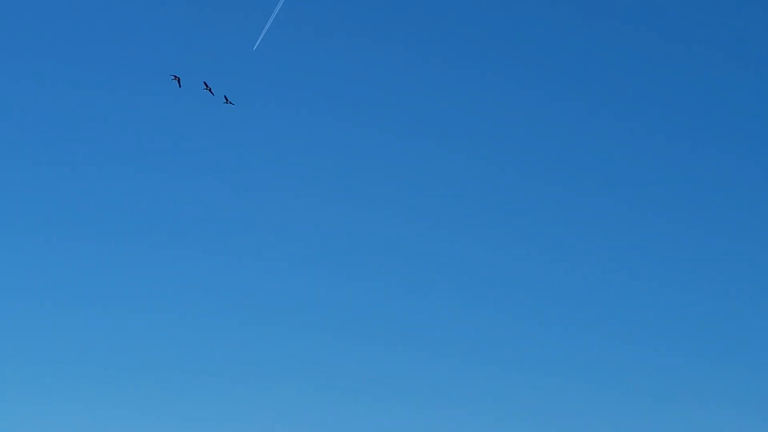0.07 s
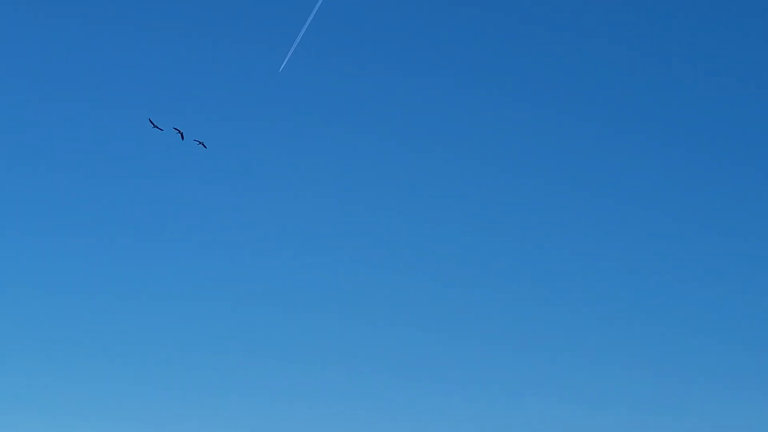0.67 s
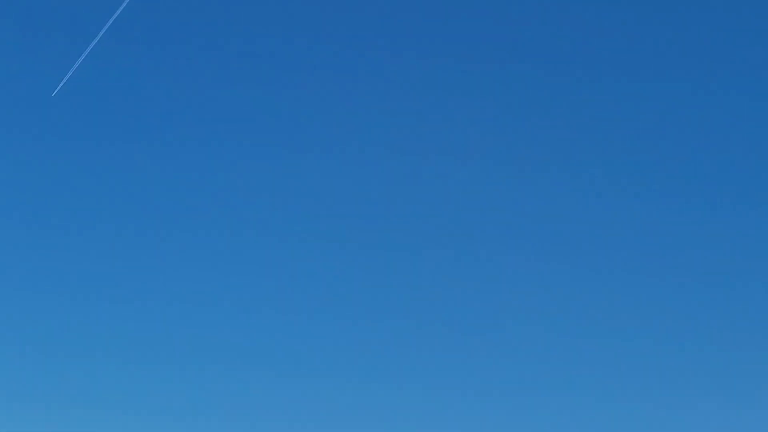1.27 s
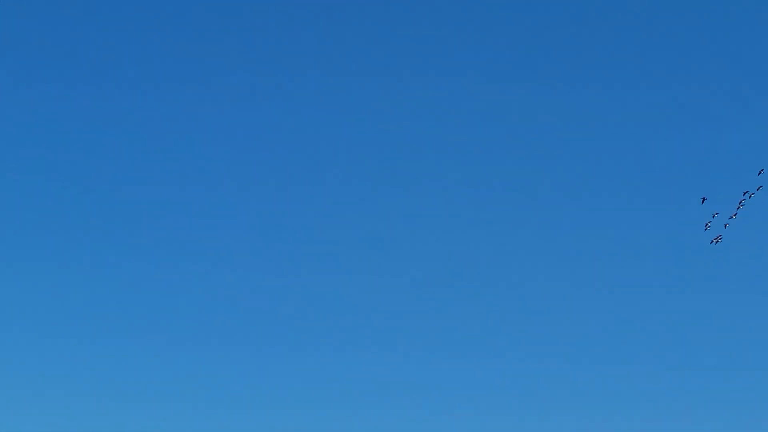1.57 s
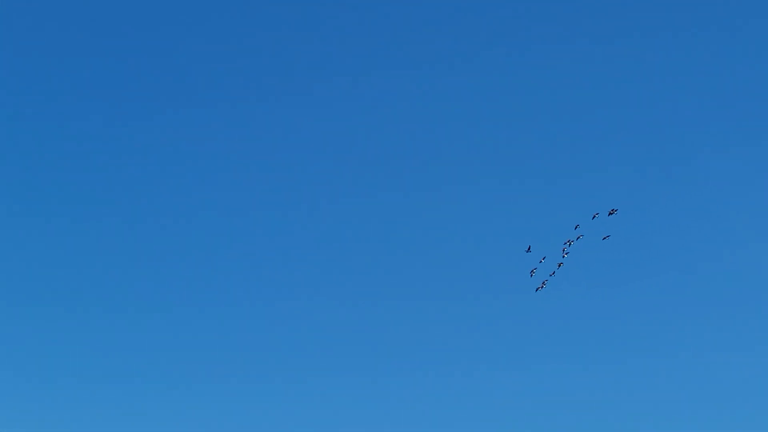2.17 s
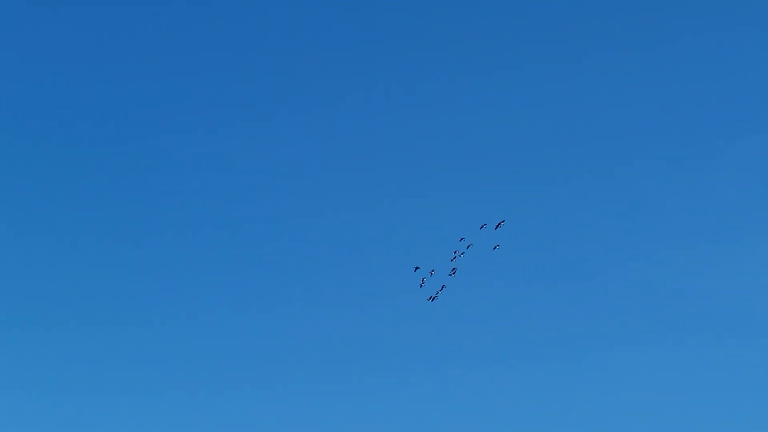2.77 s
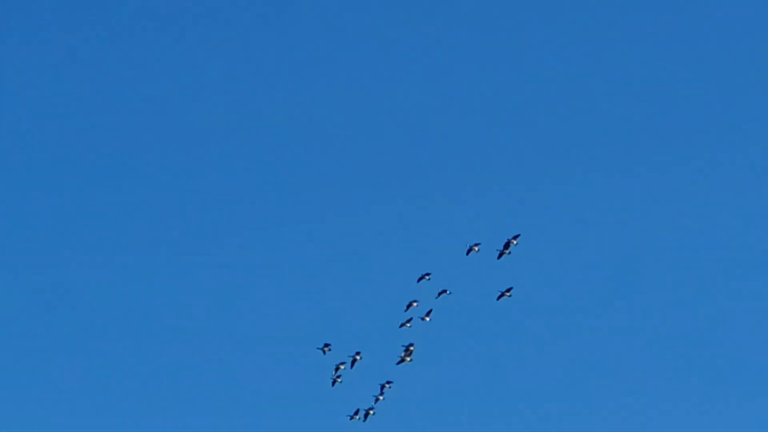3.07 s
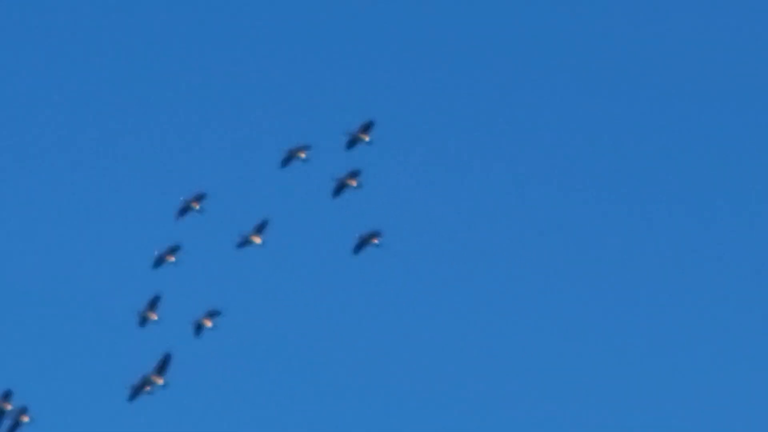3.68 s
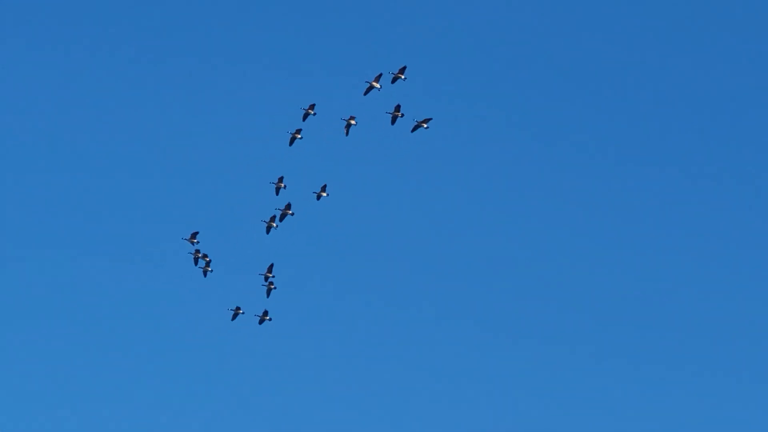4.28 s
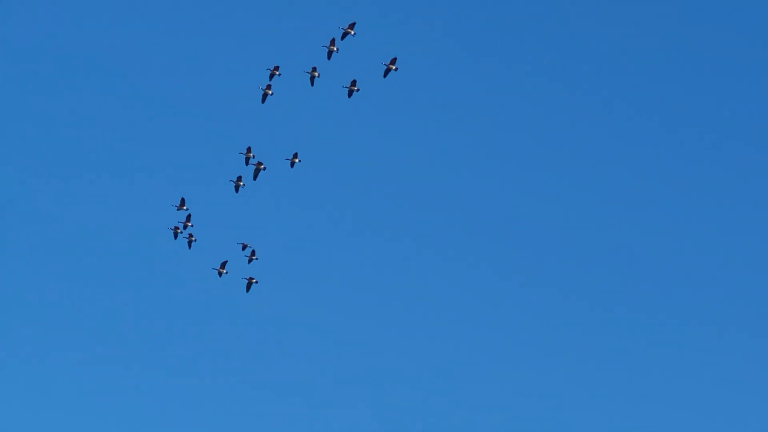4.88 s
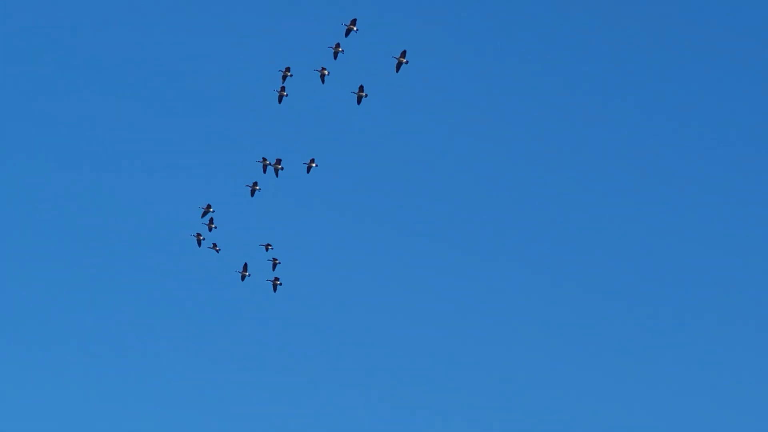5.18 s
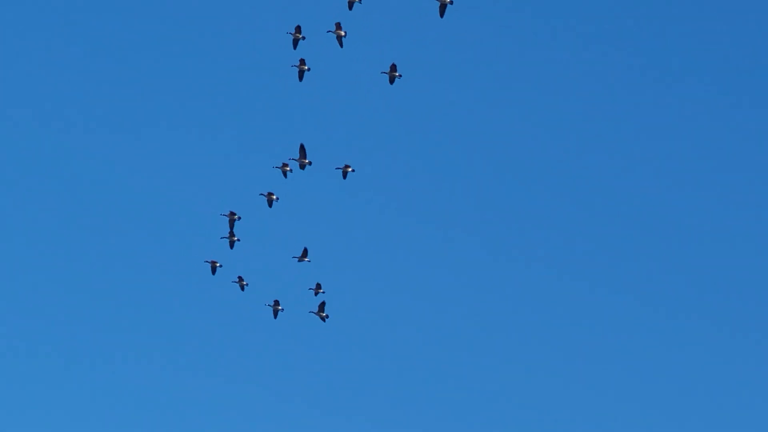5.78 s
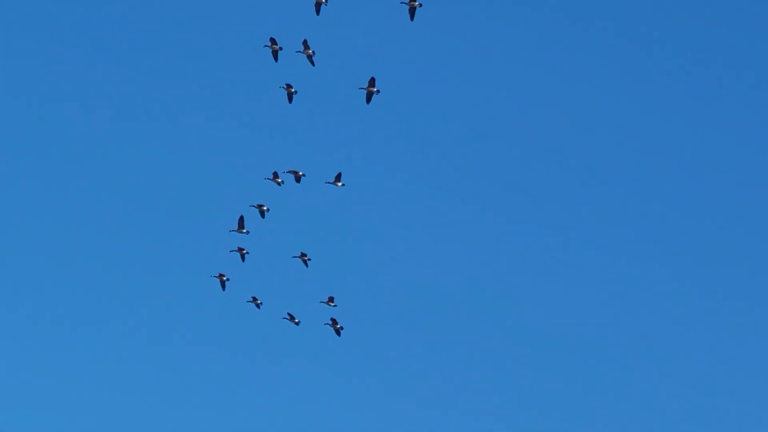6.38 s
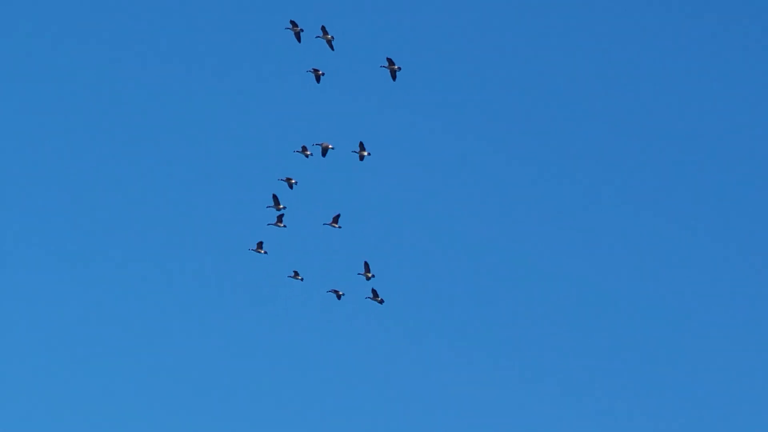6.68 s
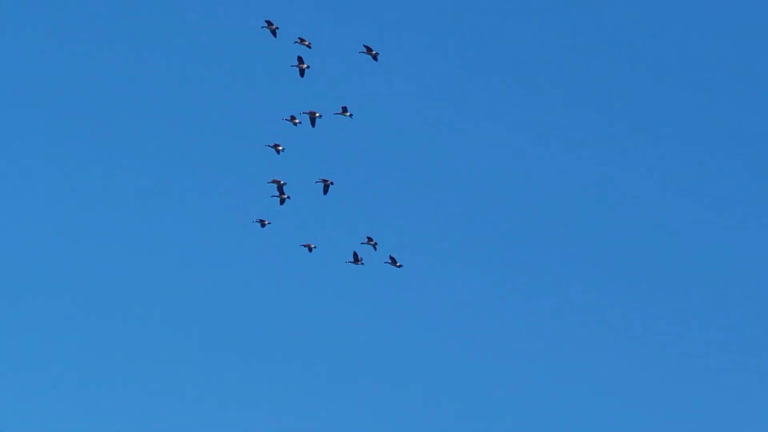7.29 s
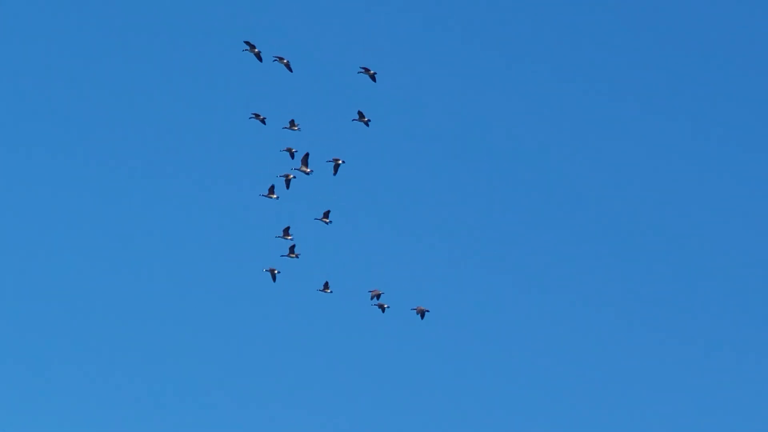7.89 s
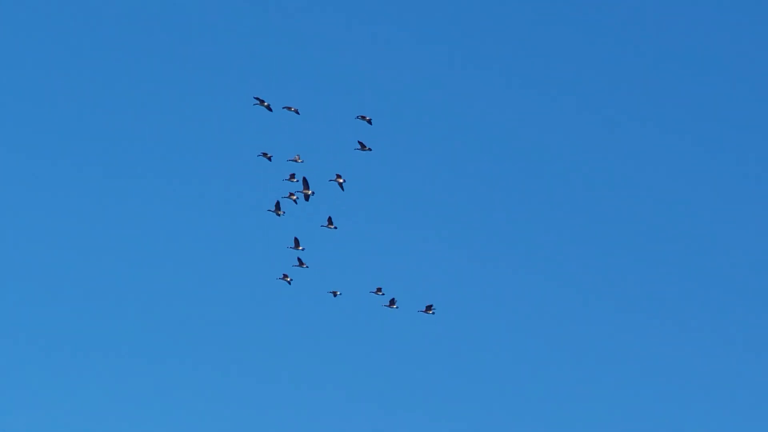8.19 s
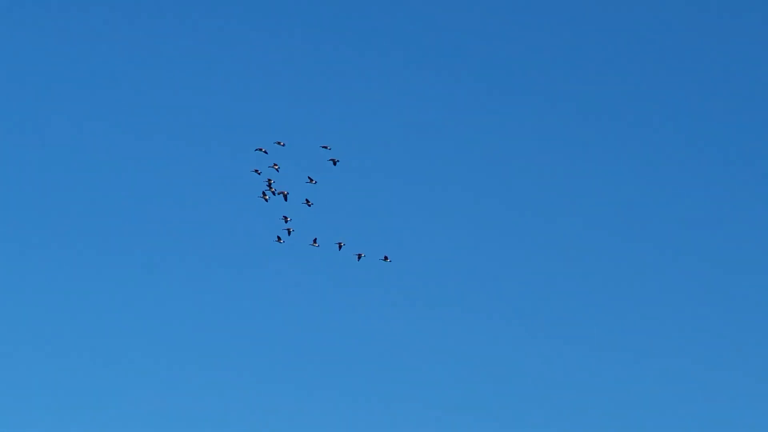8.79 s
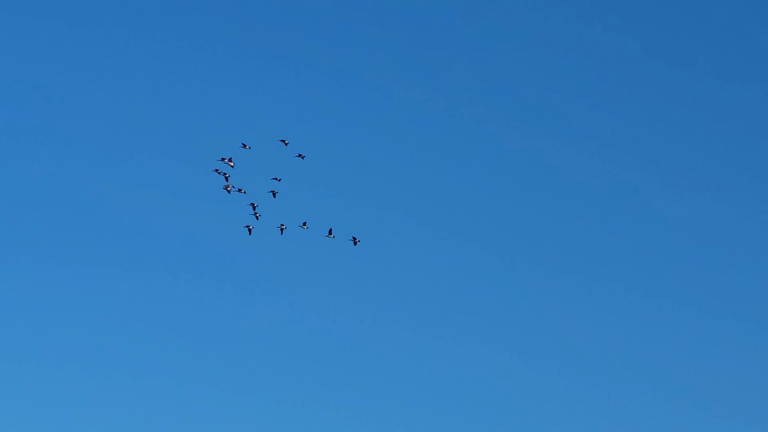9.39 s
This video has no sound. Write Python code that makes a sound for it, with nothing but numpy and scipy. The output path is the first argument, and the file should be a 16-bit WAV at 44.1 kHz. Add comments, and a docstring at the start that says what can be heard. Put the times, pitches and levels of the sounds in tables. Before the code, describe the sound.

A flock of geese flies overhead, trading honks and hoarse barks over wind rumble, soft hiss and a low throbbing drone.

```python
"""Geese passing overhead

A skein of geese trades clear honks and hoarse barks, and a bird with a long nasal call joins in.
Each voice is a buzzing syrinx, coloured by the resonances of the throat. Underneath throbs a low
drone, probably an idling engine, with wind rumble, soft hiss and a few ticks of a hand-held camera."""
import sys
import numpy as np
from scipy import signal
from scipy.fft import rfft, irfft
from scipy.io import wavfile
from scipy.ndimage import map_coordinates

SR = 44100
rng = np.random.default_rng(int(sys.argv[2]) if len(sys.argv) > 2 else 0)


def to_wav(sig):
    """Store sig (one row per channel, or 1-D mono) as 16-bit WAV at the path in sys.argv[1].

    Samples outside -1..1 are clipped; the rate is SR.
    """
    pcm = np.clip(np.atleast_2d(sig), -1, 1) * 32767
    pcm = np.round(pcm).astype(np.int16)
    wavfile.write(sys.argv[1], SR, pcm.T)  # frames by channels


N = 420273
TIME = np.arange(N) / SR

# Faders for the air. Each row: time in seconds, wind rumble in dB, far hiss in dB.
AIR_LEVELS = [(0.05, -36.5, -46.5), (2.63, -37, -47.5), (3.31, -32.5, -45), (7.44, -31, -42.5),
              (9.5, -33, -43)]
# Tone of the rumble and of the hiss. Each row: frequency in Hz, spectral level in dB.
RUMBLE_SPECTRUM = [(25, -4), (45, 4), (75, 9), (100, -3.5), (170, -3), (240, -8.5), (320, -20.5),
                   (500, -35), (1000, -60.5)]
HISS_SPECTRUM = [(200, 10), (400, 4.5), (650, 4.5), (1000, 3), (1600, -0.5), (2700, -2), (3600, -9.5),
                 (5200, -11), (6800, -23.5), (9000, -39)]
# Stereo image of the air. Each row: frequency in Hz, left-right likeness from 0 to 1.
AIR_LIKENESS = [(60, 0.18), (150, 1), (300, 0.9), (600, 0.39), (1200, 0.13), (6000, 0.0069)]
# The engine's drifting idle. Each row: time in seconds, cycles per second.
ENGINE_SPEED = [(0.0, 5.099), (1.0, 5.244), (2.0, 5.074), (3.0, 5.058), (4.0, 4.891), (5.0, 4.829),
                (6.5, 4.831), (8.0, 4.894), (9.53, 4.85)]
# The drone's partials, main tone first. Each row: multiple of the cycle rate, level in dB.
ENGINE_ORDERS = [(11, 6), (8, -6), (10, -7.5), (13, -1), (14, -15), (16, -14), (24, -11.5)]
# Fader for the drone. Each row: time in seconds, level in dB.
ENGINE_LEVEL = [(0, -17.5), (1.6, -20), (2.4, -22.5), (2.7, -20.5), (3.1, -16.5), (4.6, -18), (6, -18),
                (7.7, -16), (8.7, -18.5), (9.53, -17.5)]
# Handling knocks. Each row: start in seconds, peak in dB.
TICK_HITS = [(.081, -27), (0.097, -30), (.78, -29), (1.964, -32)]
# Modes of the camera's body. Each row: frequency in Hz, level in dB, seconds to fade by 60 dB.
CAMERA_MODES = [(634, -12, 0.051), (1090, -15, 0.042), (1380, -3.5, 0.012), (2750, -17.5, 0.0097),
                (4920, -11, 0.0019)]

# Throat resonances. Each row: centre in Hz, width in Hz.
GOOSE_THROAT = [(1450, 520), (2700, 2300), (4900, 1580), (8600, 550)]   # low, middle, bright ring, thin edge
DISTANT_THROAT = [(700, 610), (1400, 2000)]   # what distance leaves of a honk
NASAL_RESONANCE = [(2370, 1270)]
# The flock's pass. Each row: time in seconds, level of a far honk in dB, right-ear lag in ms.
FLOCK_PATH = [(0, -57, 0.12), (2.2, -56, 0.26), (4, -47.5, 0.24), (6, -46, 0.12), (8, -46, 0.031),
              (9.5, -49, -0.12)]
# Replies from farther off. Each row: start in seconds, length in seconds, top pitch in Hz,
# place of that top from 0 to 1, level in dB.
ANSWER_CALLS = [(0.498, 0.049, 705, 0.9, -50), (0.655, 0.11, 800, 0.55, -48), (0.81, 0.13, 763, 0.2, -55),
                (1.422, 0.08, 809, 0.5, -48.5), (1.47, 0.07, 772, 0.6, -50), (2.653, 0.13, 737, 0.3, -47),
                (4.037, 0.091, 690, 0.7, -47), (4.115, 0.077, 621, 0.9, -46.5),
                (4.451, 0.09, 743, 0.9, -42), (4.647, 0.1, 741, 0.8, -42), (4.749, 0.07, 783, 0.8, -40.5),
                (4.875, 0.08, 736, 0.4, -38), (5.435, 0.078, 718, 0.7, -51),
                (5.756, 0.073, 726, 0.45, -45.5), (6.206, 0.02, 735, 0.6, -36),
                (6.298, 0.069, 779, 0.8, -40.5), (6.471, 0.07, 756, 0.2, -38.5),
                (6.787, 0.052, 704, 0.5, -37.5), (6.788, 0.07, 800, 0.52, -40),
                (6.846, 0.087, 737, 0.6, -41), (7.202, 0.05, 796, 0.6, -41.5),
                (7.624, 0.061, 806, 0.4, -45), (7.847, 0.064, 726, 0.6, -49),
                (7.978, 0.07, 737, 0.5, -42.5), (9.12, 0.052, 753, 0.51, -50)]
# The nasal bird's part. Each row: start in seconds, length in seconds, top pitch in Hz,
# place of that top from 0 to 1, level in dB, roughness (0 is clean).
LONG_CALLS = [(5.57, 0.22, 259, 0.53, -42.5, 0.4), (6.169, 0.21, 254.6, 0.5, -42.5, 0.6),
              (7.943, 0.265, 251.4, 0.43, -38, 0.3), (8.374, 0.31, 237.3, 0.3, -45, 0.2),
              (8.898, 0.26, 241.2, 0.2, -44, 0.36)]
# Hoarse low barks. Each row: start in seconds, length in seconds, top pitch in Hz, level in dB,
# bright ring in dB against that level, nasal resonance in Hz, roughness (0 is clean).
BARK_CALLS = [(0.178, 0.073, 391.3, -41.5, -18, 1920, 0.54), (1.22, 0.08, 553.5, -43, -26, 1990, 0.8),
              (2.215, 0.086, 287.3, -45.5, -13.5, 1930, 0.62), (2.758, 0.058, 276.3, -39, -30, 1870, 0.1),
              (3.293, 0.086, 282.4, -36.5, -20.5, 1980, 0.6), (3.68, 0.09, 384, -46.5, -11.5, 1640, 0.7),
              (4.192, 0.096, 563, -35.5, -6, 2080, 0.98), (4.46, 0.094, 463.5, -40.5, -34, 1460.0, 0.7),
              (5.179, 0.081, 422, -41, -33, 1310, 0.8), (5.695, 0.038, 431.4, -40.5, -21, 1990, 1.1),
              (5.935, 0.12, 321.6, -38.5, -14, 1970, 0.65), (6.17, 0.085, 357, -39.5, -21, 1910, 1),
              (6.503, 0.08, 547.4, -34.5, -31, 2130, 0.41), (6.79, 0.12, 400, -43.5, -20, 1980, 0.4),
              (7.233, 0.079, 557.4, -40.5, -8, 1650, 0.8), (7.435, 0.11, 377, -39.5, -14, 1620, 1.1),
              (7.905, 0.125, 371, -37, -24.5, 1550, 1), (8.57, 0.038, 418.3, -40.5, -12, 1720.0, 0.8),
              (9.228, 0.065, 465, -45, -10, 1230, 0.6), (9.463, 0.092, 379, -42, -27, 1594, 0.3)]
# Clear honks. Each row: start in seconds, length in seconds, top pitch in Hz, level in dB,
# bright ring in dB against that level.
HONK_CALLS = [(0.482, 0.072, 932, -44, -3.5), (0.554, 0.032, 968, -50, -9.5), (0.717, 0.05, 791, -47, 6.5),
              (0.789, 0.065, 780, -52.5, 10), (1.061, 0.045, 886, -47, 0.5), (1.126, 0.06, 1212, -46, -24),
              (1.274, 0.044, 1114, -49, -24), (1.334, 0.065, 1062, -49, 8.5), (1.383, 0.055, 940, -50, -2),
              (1.549, 0.052, 691, -50, -3), (1.967, 0.052, 974, -52, -2), (2.459, 0.065, 934, -56, 3),
              (2.583, 0.044, 950, -54.5, -0.5), (2.778, 0.045, 706, -48.5, -1),
              (2.929, 0.05, 768, -44.5, -18.5), (2.977, 0.042, 750, -54.5, 1), (3.01, 0.065, 761, -42, -13),
              (3.119, 0.064, 940, -58.5, -1), (3.194, 0.043, 748, -39.5, -28),
              (3.373, 0.084, 710, -46.5, -5.5), (3.467, 0.054, 893, -55.5, 4.5),
              (3.505, 0.052, 959, -56, 8.5), (3.589, 0.065, 952, -51, -6), (3.691, 0.052, 772, -42, -18),
              (3.917, 0.064, 817, -44.5, -13), (4.075, 0.045, 914, -55.5, 5.5),
              (4.445, 0.055, 688, -43.5, 1.5), (4.521, 0.04, 770, -38, -6), (4.579, 0.024, 842, -48.5, 3.5),
              (4.985, 0.055, 872, -48, 3.5), (5.049, 0.055, 768, -45, -4), (5.107, 0.064, 939, -56.5, 9.5),
              (5.266, 0.081, 654, -48, -3.5), (5.499, 0.066, 932, -62, 7), (6.059, 0.06, 921, -43.5, -3.5),
              (6.582, 0.06, 845, -57.5, 7), (6.736, 0.09, 850, -47, -1.5), (6.918, 0.075, 889, -47.5, -3.5),
              (7.39, 0.05, 821, -39.5, -13), (7.478, 0.042, 835, -44, -1), (7.783, 0.05, 817, -40.5, -1.5),
              (8.023, 0.03, 883, -47, 5), (8.248, 0.04, 822, -36, -13), (8.725, 0.02, 744, -43, -9),
              (8.76, 0.032, 790, -36.5, -16), (8.815, 0.063, 754, -41, -17),
              (8.933, 0.036, 743, -42, -11.5), (9.008, 0.04, 746, -48, -7), (9.041, 0.029, 792, -37, -10),
              (9.342, 0.042, 822, -46.5, -2)]
# The honks grow hoarse in bouts. Each row: time in seconds, roughness from 0 to 1.
HONK_HOARSENESS = [(1, 0.25), (4.1, 0.35), (4.45, 0.6), (4.95, 0.25), (6.1, 0.3), (6.6, 0.6), (8.3, 0.42)]
# The honks' bright ring as the flock passes. Each row: time in seconds, centre in Hz.
HONK_RING = [(0.5, 5530), (2.8, 5240), (3.1, 5060), (6.8, 5020), (8, 5420)]

# The ground bounce, latest with the birds overhead. Each row: time in seconds, delay in seconds.
GROUND_DELAY = [(0, 0.0042), (6.5, .009), (9.5, .007)]
# Tone difference between the microphones. Each row: frequency in Hz, left minus right in dB.
MIC_BALANCE = [(300, 0), (650, -2), (1000, 1.5), (1700, 1.5), (2500, 5), (3600, 5), (4600, -1), (5800, 1.5),
               (7000, 14), (9000, 0)]
# Phase between the microphone ports. Each row: frequency in Hz, lead of the left in radians.
MIC_PHASE = [(400, 0), (1000, .4), (1800, .8), (2500, .6), (3700, 4), (4200, 5), (5200, 9), (6500, 8.5)]

CUTOFF_HZ = 6837   # the treble steps down above this


def from_db(db):
    """Decibels to gain."""
    return 10 ** (np.asarray(db) / 20)


def unit_rms(x):
    """Scales a sound to rms 1."""
    return x / np.sqrt(np.mean(x ** 2) + 1e-20)


def in_time(rows, at=TIME):
    """The columns of an automation curve, read at the given times."""
    seconds, *columns = np.transpose(rows)
    return [np.interp(at, seconds, column) for column in columns]


def per_bin(points):
    """An EQ curve, read at every Fourier bin."""
    hz, value = np.transpose(points)
    return np.interp(np.log(np.fft.rfftfreq(N, 1 / SR) + 1), np.log(hz), value)


def wander(rate_hz, size):
    """A random drift with a spread of about 1."""
    at = np.arange(size) * rate_hz / SR
    return map_coordinates(rng.standard_normal(int(at[-1]) + 2), [at], order=1)


def add(track, start, sound):
    """Mixes a sound into a track at a start time in seconds."""
    at = int(np.clip(start * SR, 0, N - 1))
    track[at:at + len(sound)] += sound[:N - at]


def air_noise(spectrum):
    """Shaped stereo noise, centred in the upper bass and wide in the treble."""
    alike = np.clip(per_bin(AIR_LIKENESS), 0, 1)
    mid, side = rfft(rng.standard_normal((2, N))) * from_db(per_bin(spectrum))
    return unit_rms(irfft(np.sqrt(1 + alike) * mid + np.sqrt(1 - alike) * side * [[1], [-1]], N))


def outdoor_hiss(trim_db=1.0):
    """A soft bed of far-off hiss."""
    return from_db(in_time(AIR_LEVELS)[1] + trim_db) * air_noise(HISS_SPECTRUM)


def wind_rumble(trim_db=6.5, gust_db=2.0):
    """Low wind noise, shaken by quick gusts."""
    level_db = in_time(AIR_LEVELS)[0] + trim_db + gust_db * wander(12, N)
    return from_db(level_db) * air_noise(RUMBLE_SPECTRUM)


def engine(unsteady_db=2.0, slip_radians=0.24, first_dip_cycles=0.213):
    """Once a cycle the side partials pull against the main tone, so the drone throbs."""
    turn = 2 * np.pi * (np.cumsum(in_time(ENGINE_SPEED)[0]) / SR - first_dip_cycles)
    (main_order, main_db), *sides = ENGINE_ORDERS
    main_tone = from_db(main_db) * np.cos(main_order * turn)
    side_tones = sum(from_db(db) * np.cos(order * turn - slip_radians) for order, db in sides)
    level_db = in_time(ENGINE_LEVEL)[0] + unsteady_db * wander(5.9, N)
    return from_db(level_db) * unit_rms(side_tones - main_tone)


def camera_ticks():
    """Small knocks ring the camera's body for a moment."""
    out, t = np.zeros(N), TIME[:SR // 20]
    ring = sum(from_db(db - 60 * t / t60) * np.sin(2 * np.pi * hz * t) for hz, db, t60 in CAMERA_MODES)
    for start, peak_db in TICK_HITS:
        add(out, start, from_db(peak_db) * ring / np.abs(ring).max())
    return out


def bird_call(length, pitch, top, levels_db, rough, throat, bend, scoop=0.04, droop=0.049,
              waver=0.0036, settle=0.94, jitter=0.016, rasp=0.96, subharmonics=0.98, fundamental_db=0.0,
              twinkle_db=2.5, swell=0.46, bright_swell=0.29, lateness=0.86, steep=1.58):
    """A syrinx buzzes on an arch of pitch, heard through the throat's resonances."""
    size = int(length * SR)
    progress = np.linspace(0, 1, size)
    arch = -bend * (progress - top) ** 2 - scoop * (1 - progress) ** 6 - droop * progress ** 6
    hz = pitch * np.exp(arch + waver * wander(70, size))
    hoarse = 2 * rough * (1 - progress) ** settle   # a hoarse start firms into a clean tone
    phase = 2 * np.pi * np.cumsum(hz * (1 + jitter * hoarse * wander(400, size))) / SR

    # Strong and weak beats in turn put partials halfway between the harmonics.
    orders = np.arange(2, int(3 * CUTOFF_HZ / pitch))[:, None] / 2
    strength = np.where(orders % 1 == 0, 1, subharmonics * hoarse)
    strength *= from_db(fundamental_db * (orders == 1))   # a small bill radiates the lowest one poorly
    flutter = np.array([wander(260, size) for _ in orders])
    twinkle = np.array([wander(44.3, size) for _ in orders])   # moving air makes partials come and go
    strength *= from_db(twinkle_db * twinkle) * (1 + rasp * hoarse * flutter)
    scatter = 1.22 * rng.standard_normal(orders.shape)   # loosely in step: still one pulse a beat
    partials = strength * np.cos(orders * phase + scatter)

    push = np.abs(np.sin(np.pi * progress ** lateness))   # lateness over 1 delays the peak
    out = 0
    for n, ((centre_hz, width_hz), level_db) in enumerate(zip(throat, levels_db)):
        moving_hz = centre_hz * (hz / pitch) ** 0.66   # the throat closes as the pitch falls
        resonance = 1 / (1 + (2 * (orders * hz - moving_hz) / width_hz) ** 2) ** steep
        effort = push ** (swell + bright_swell * n)   # later resonances in the list need more push
        out = out + from_db(level_db) * unit_rms(effort * (resonance * partials).sum(0))
    return out


def far_flock(count=190, centre_pitch_hz=620, dull_db=(-12.0, -7.0)):
    """The rest of the flock is a dense tangle of falling honks, dulled by distance."""
    out = np.zeros(N)
    for n, (when, long, high, loud) in enumerate(rng.uniform(-1, 1, (count, 4))):
        start = (n + 0.5 + when) / count * TIME[-1]
        length = 0.1 + 0.03 * long
        pitch = centre_pitch_hz * 2 ** (0.55 * high)
        levels_db = in_time(FLOCK_PATH, start)[0] + 4 * loud + np.array(dull_db)
        add(out, start, bird_call(length, pitch, top=0.352, levels_db=levels_db, rough=0.23,
                                  throat=DISTANT_THROAT, bend=0.422, fundamental_db=-3.0))
    return out


def answering_geese(hollow_db=(-1.0, -17.0), overhang_s=0.01):
    """Birds farther off answer with hollow, nearly clean honks that have lost their bright ring."""
    out = np.zeros(N)
    for start, length, pitch, top, level_db in ANSWER_CALLS:
        answer = bird_call(length + 2 * overhang_s, pitch, top, level_db + np.array(hollow_db),
                           rough=0.13, throat=GOOSE_THROAT[:2], bend=0.25, droop=0.077, waver=0.007)
        add(out, start - overhang_s, answer)
    return out


def nasal_bird():
    """A long, slow buzz through a single resonance."""
    out = np.zeros(N)
    for start, length, pitch, top, level_db, rough in LONG_CALLS:
        add(out, start, bird_call(length, pitch, top, [level_db], rough, NASAL_RESONANCE,
                                  bend=0.42, swell=0.24, lateness=0.85, subharmonics=0.4))
    return out


def barking_geese(body_trim_db=-3.5, ring_trim_db=-0.5, edge_db=-28.5, overhang_s=0.008):
    """Near geese in their low voice: a rasp builds into a nasal tone and breaks off."""
    out = np.zeros(N)
    windpipe, nasal_bite = (1110, 200), (2870, 1100)   # centre and width in Hz
    for start, length, pitch, level_db, bright_db, nasal_hz, rough in BARK_CALLS:
        body_db = level_db + body_trim_db
        windpipe_db = body_db + 0.5 - 11 * rough   # a firm bark also rings the windpipe
        bite_db = body_db - 7.5 + 0.12 * (bright_db + 15.0)
        ring_db = level_db + bright_db + ring_trim_db
        throat = [(nasal_hz, 560), windpipe, nasal_bite, *GOOSE_THROAT[2:]]
        levels_db = [body_db, windpipe_db, bite_db, ring_db, ring_db + edge_db]
        bark = bird_call(length + 2 * overhang_s, pitch, top=0.5, levels_db=levels_db, rough=rough,
                         throat=throat, bend=0.16, droop=0.062, settle=1.2, rasp=1.0, subharmonics=0.64,
                         swell=0.39, bright_swell=0.15, lateness=1.41, steep=1.19)
        add(out, start - overhang_s, bark)
    return out


def honking_geese(body_trim_db=-4.0, ring_trim_db=-2.5, edge_db=-28.5, usual_hz=820, overhang_s=0.0093):
    """Near geese in their high voice: every honk starts hoarse, firms up and falls away."""
    out = np.zeros(N)
    low, middle, (_, ring_width_hz), edge = GOOSE_THROAT
    for start, length, pitch, level_db, bright_db in HONK_CALLS:
        # A higher honk opens the bill: weight moves from the low to the middle resonance.
        opening = from_db(-4.5 + 23.5 * np.log2(pitch / usual_hz))
        weights = np.array([1, opening]) / np.hypot(1, opening)
        body_db = level_db + body_trim_db + 20 * np.log10(weights)
        ring_db = level_db + bright_db + ring_trim_db
        throat = [low, middle, (in_time(HONK_RING, start)[0], ring_width_hz), edge]
        levels_db = [*body_db, ring_db, ring_db + edge_db]
        rough = in_time(HONK_HOARSENESS, start)[0]
        top, scoop = np.array([0.42, 0.05]) * (1 + 0.4 * rng.uniform(-1, 1, 2))   # no two arches alike
        honk = bird_call(length + 2 * overhang_s, pitch, top, levels_db, rough, throat, bend=0.16,
                         scoop=scoop, droop=0.022, waver=0.006, settle=1.8, subharmonics=0.65)
        add(out, start - overhang_s, honk)
    return out


def open_air(birds, t60=0.11, scatter_db=-5.0, ground_db=-3.5, dull_hz=2800):
    """The calls reach one ear late, bounce off the ground and scatter dully from the surroundings."""
    def delayed(seconds):
        return map_coordinates(birds, [(TIME - seconds) * SR], order=2)

    ear_lag = in_time(FLOCK_PATH)[1] / 1000
    direct = np.array([delayed(-ear_lag / 2), delayed(ear_lag / 2)])
    bounce = from_db(ground_db) * delayed(in_time(GROUND_DELAY)[0])
    t = TIME[:SR]
    tail = rng.standard_normal((2, SR)) * from_db(-60 * t / t60) * (1 - np.exp(-t / 0.011))
    tail = signal.sosfilt(signal.butter(2, dull_hz, fs=SR, output="sos"), unit_rms(tail) / np.sqrt(SR))
    return direct + bounce + from_db(scatter_db) * signal.fftconvolve(birds[None], tail, axes=1)[:, :N]


def scene():
    """Geese in the open air over wind, hiss, the drone and a few ticks."""
    air = wind_rumble() + outdoor_hiss()
    birds = honking_geese() + barking_geese() + answering_geese() + far_flock() + nasal_bird()
    return air + open_air(birds) + engine() + camera_ticks()


def record(dry, shelf_db=-9.5, top_hz=15700):
    """The right microphone is duller than the left and out of step with it; both lose their top end."""
    sides = np.array([[0.5], [-0.5]])
    balance = from_db(per_bin(MIC_BALANCE) * sides)
    balance /= np.sqrt(np.mean(balance ** 2, axis=0))
    phase_shift = np.exp(1j * per_bin(MIC_PHASE) * sides)
    shelf = from_db(per_bin([(CUTOFF_HZ, 0), (1.05 * CUTOFF_HZ, shelf_db)]))
    coloured = irfft(rfft(dry) * balance * phase_shift * shelf, N)
    return signal.sosfilt(signal.cheby2(12, 70, top_hz, fs=SR, output="sos"), coloured)


dry = scene()
out = record(dry)
to_wav(out)
```